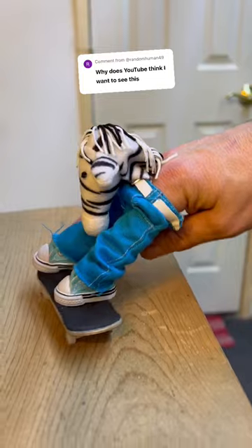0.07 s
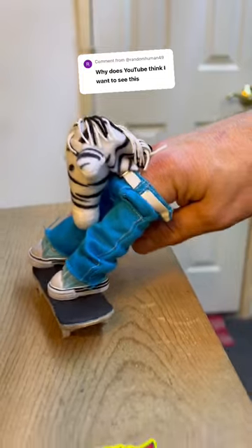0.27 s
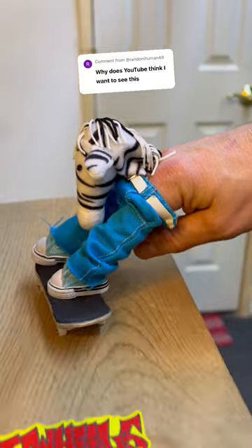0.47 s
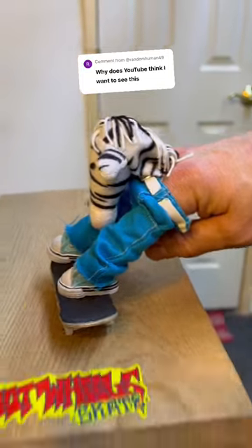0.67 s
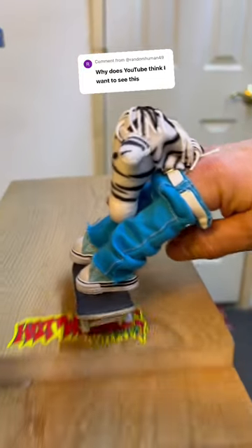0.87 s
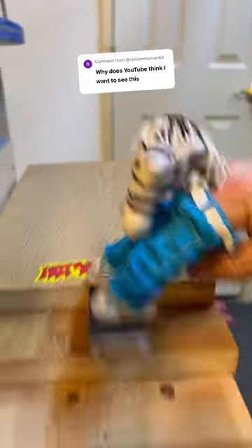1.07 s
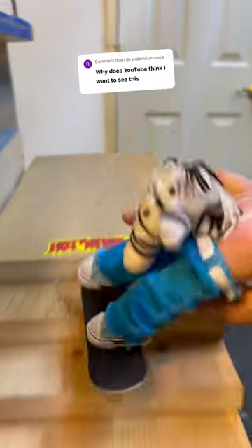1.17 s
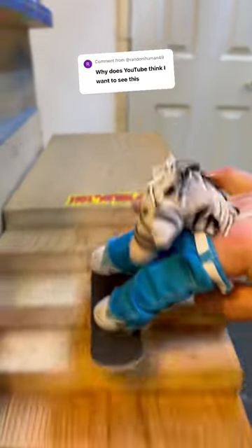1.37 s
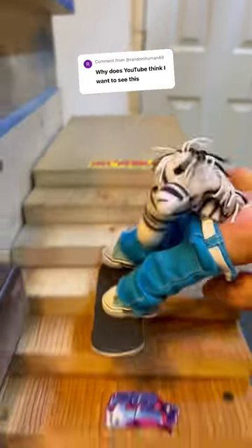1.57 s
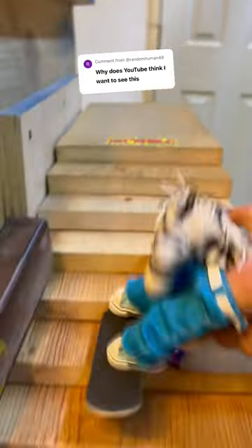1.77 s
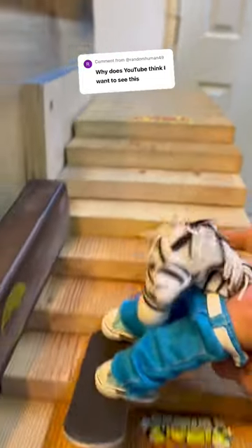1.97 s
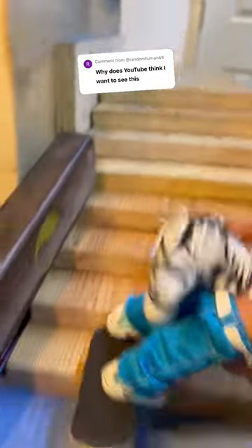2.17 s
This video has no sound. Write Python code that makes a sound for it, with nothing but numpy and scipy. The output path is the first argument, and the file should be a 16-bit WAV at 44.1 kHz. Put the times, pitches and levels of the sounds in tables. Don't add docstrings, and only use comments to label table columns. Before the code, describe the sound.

Toy skateboard rolls grittily over hollow wood, then clacks down small wooden steps in quick pairs

```python
import sys
import numpy as np
from scipy import signal
from scipy.fft import rfft, irfft, next_fast_len
from scipy.io import wavfile
from scipy.ndimage import uniform_filter1d

SR = 44100
rng = np.random.default_rng(int(sys.argv[2]) if len(sys.argv) > 2 else 0)


def gain_from_decibels(decibels):
    exponent = np.asarray(decibels, float) / 20
    return 10 ** exponent


def unload_wav(signal):
    wavfile.write(
        sys.argv[1],
        SR,
        np.round(np.clip(np.atleast_2d(signal).T, -1, 1) * 32767).astype(np.int16),
    )


N = 98298
t = np.arange(N) / SR
PORTS = np.array([[0], [-np.pi / 2]])


def read(table, hz):
    table = np.array(table, float)
    return np.interp(np.log(hz + 1), np.log(table[:, 0]), table[:, 1])


def unit(x):
    return x / np.sqrt(np.mean(x ** 2))


def band(x, hz, width):
    return signal.lfilter(*signal.iirpeak(hz, hz / width, SR), x)


def add(out, start_s, x):
    i = int(start_s * SR)
    out[..., i:i + x.shape[-1]] += x[..., :N - i]


def ring(hz, t60, rise, phase=0., size=8000):
    u = np.arange(size) / SR
    envelope = (1 - np.exp(-u / rise)) * np.exp(-np.log(1000) * u / t60)
    return envelope * np.sin(2 * np.pi * hz * u + phase)


def walk(rate):
    k = int(SR / rate)
    steps = np.repeat(rng.standard_normal(N // k + 1), k)
    return 1.65 * uniform_filter1d(uniform_filter1d(steps, k), k)[:N]


# pitch_hz, level_db (per Hz)
AIR_SPECTRUM = [(30, -7), (70, 1.5), (130, 9.5), (260, 6), (500, 10), (1000, -12.5), (2000, -24),
                (16000, -75)]
# pitch_hz, level_db (rms)
MAINS_HUM = [(120, -66.5), (241, -50)]


def air():
    rumble = 0
    for hz in 40 * 2 ** np.arange(0, 8.6, .5):
        noise = rng.standard_normal((2, N))
        noise = band(band(noise, hz, hz / 2), hz, hz / 2)
        rumble = rumble + gain_from_decibels(read(AIR_SPECTRUM, hz) + 0.97 * walk(5.71)) * noise
    hum = 0
    for hz, db in MAINS_HUM:
        level = gain_from_decibels(db + 3 + 2.5 * walk(18))
        hum = hum + level * np.sin(2 * np.pi * np.cumsum(hz + 5 * walk(14)) / SR)
    return unit(rumble) * gain_from_decibels(-41.5) + hum


ROOM_HZ, ROOM_T60_S, ROOM_DB = (350, 1500, 6000), (0.1, 0.43, 0.16), (-15.5, -24.5, -17)


def room(x):
    u, tail = np.arange(SR // 2) / SR, 0
    for hz, t60, db in zip(ROOM_HZ, ROOM_T60_S, ROOM_DB):
        fade = (1 - np.exp(-u / 0.0071)) * np.exp(-np.log(1000) * u / t60)
        part = band(rng.standard_normal((2, len(u))), hz, 1.276 * hz) * fade
        tail = tail + gain_from_decibels(db) * part / np.sqrt(np.sum(fade ** 2) * hz / SR * 4)
    return signal.fftconvolve(x, tail, axes=1)[:, :N]


# pitch_hz, width_hz, level_db
DECK_MODES = [(1350, 1010, -4), (2450, 535, 3.5), (2705, 880, 0), (3723, 736, 4), (4080, 960, 0.5),
              (5430, 1350, 5.5), (6760, 3150, 7), (7720, 2020, 8), (9580, 820, -3)]


def crack(treble_db, rise, buzz_db, size=2500):
    u = np.arange(size) / SR
    blow = (u / rise) ** 2 * np.exp(-u / rise) * 2
    buzz = gain_from_decibels(buzz_db) * (1 - np.exp(-u / rise)) * np.exp(-u / 0.009)
    burst = (blow + buzz) * rng.standard_normal((2, size))
    shake_db = 2.0 * rng.standard_normal(len(DECK_MODES))
    out = gain_from_decibels(-8 + treble_db) * signal.lfilter([1, -1], 1, burst)
    for k, (hz, width, db) in enumerate(DECK_MODES):
        level = gain_from_decibels(db + shake_db[k] + treble_db * (hz > 5000))
        out = out + (-1) ** k * level * band(burst, hz, width)
    return out / np.abs(out[0]).max()


# start_s, level_db, pitch_hz
AXLE_TICKS = [(0.209, -32.5, 6200), (0.2463, -34, 6270), (0.2618, -30, 5940), (0.2817, -35, 6100),
              (0.3197, -40.5, 5900), (0.3476, -43, 5870), (0.397, -35.5, 5760), (0.428, -41, 6220),
              (0.461, -39, 6030), (0.47, -38, 9140), (0.4795, -33.5, 5810), (0.5192, -45, 6200),
              (0.5462, -31, 6100), (0.5594, -43, 6760), (0.5836, -36, 5960), (0.601, -33, 6130),
              (0.6124, -29.5, 5950), (0.638, -36.5, 5800), (0.7024, -41, 5610), (0.7245, -32, 9300),
              (0.773, -35, 9700), (0.779, -33, 8800), (0.789, -32.5, 7430), (0.8053, -29, 8600),
              (0.815, -33, 8600), (0.88, -31, 8370), (0.9286, -27, 8550), (0.9421, -25, 9700),
              (0.9505, -21.5, 6800), (1.0006, -41, 6600), (1.0275, -29.5, 8650), (1.2154, -26, 5360),
              (1.22, -24, 5650), (1.2256, -17, 5410), (1.307, -27, 6100), (1.5344, -33, 8390),
              (2.2024, -37, 8400)]


def ticks():
    out = np.zeros((2, N))
    for start_s, db, hz in AXLE_TICKS:
        metal = ring(hz, 0.0073, 0.00091, PORTS, size=2500)
        add(out, start_s, gain_from_decibels(db - 2.0) * crack(2, 0.00024, -10.5) + gain_from_decibels(db - 1.0) * metal)
    return out


# pitch_hz, level_db, t60_s
PLATFORM_MODES = [(1055, -4.5, 0.09), (1112, 6.5, 0.058), (1173, 11, 0.045), (1194, -3, 0.047),
                  (1587, -12, 0.034)]
# start_s, level_db
FLAT_KNOCKS = [
    (.790, -36.5),
    (.892, -36),
    (.924, -30),
    (0.956, -25),
    (0.986, -32.5),
    (1.017, -28),
    (1.041, -30),
    (1.1178, -13),
    (1.1443, -22.5),
    (1.164, -33),
]


def knocks():
    out = np.zeros((2, N))
    for start_s, db in FLAT_KNOCKS:
        for hz, mode_db, t60 in PLATFORM_MODES:
            level_chance, phase_chance = rng.standard_normal(2)
            mode = ring(hz, .85 * t60, .005, .4 * phase_chance + PORTS)
            add(out, start_s, gain_from_decibels(db + mode_db + 2.0 * level_chance) * mode)
    return out


# pitch_hz, width_hz, level_db
GRIT_BANDS = [(2240, 240, 9.5), (3876, 350, 7.5), (5930, 2200, -0.5), (8340, 930, -1.5)]
# start_s, hiss_db, drone_db, scrape_db
ROLL_LEVELS = [(0.192, -98.5, -88, -57), (0.208, -55, -47, -56.5), (0.257, -78, -44.5, -46),
               (0.298, -69, -60, -58), (.52, -59.5, -76, -54.5), (.60, -59, -47, -56.5),
               (.68, -56, -54, -80), (.80, -57, -50, -102), (1.041, -55, -40, -40.5),
               (1.20, -58, -87, -44.5), (1.25, -67, -55.5, -50), (2.22, -57, -54, -48.5)]


def rolling():
    roll_s, *levels = np.array(ROLL_LEVELS).T
    hiss_db, drone_db, scrape_db = (np.interp(t, roll_s, level) for level in levels)
    grains = rng.random(N) < 700 / SR
    grit = grains * gain_from_decibels(3.0 * np.minimum(rng.exponential(size=N), 2.5))
    grit = signal.lfilter([1], [1, -.96], grit) + 0.58

    crushed = grit * rng.standard_normal((2, N))
    hiss = sum(gain_from_decibels(db) * band(crushed, hz, width) for hz, width, db in GRIT_BANDS)
    hiss = unit(hiss) * gain_from_decibels(hiss_db + 3.3 * walk(27.4) + 1.5)
    scrape = unit(band(grit * rng.standard_normal((2, N)), 1150, 1400)) * gain_from_decibels(scrape_db)

    grain = rng.standard_normal((2, N)) * gain_from_decibels(2.5 * walk(60))
    drone = sum(gain_from_decibels(db) * band(grain, hz, 3 / t60) for hz, db, t60 in PLATFORM_MODES)
    turn_db = 2.7 * np.cos(2 * np.pi * 32.6 * (t - .9600))
    drone = unit(drone) * gain_from_decibels(drone_db + turn_db + 1)
    return hiss + scrape + drone + ticks() + knocks()


# start_s, floor_db, table_db, box_db
LANDING_THUDS = [(0.101, -41.5, -56, -54), (0.168, -46, -44, -60), (1.105, -40, -37, -61),
                 (1.275, -38, -36, -35.5), (1.467, -44, -38.5, -43), (1.612, -34.5, -39, -49.5),
                 (1.781, -41, -39, -47.5), (1.741, -44, -44, -40.5), (1.903, -35.5, -47, -53),
                 (1.944, -45, -35.5, -41.5), (2.095, -39, -40, -54), (2.143, -40, -33, -32)]
THUD_HZ, THUD_T60_S, THUD_RISE_S = (55, 112, 285), (.10, .16, .09), (.02, .025, .01)


def thuds():
    out = np.zeros((2, N))
    for start_s, *levels_db in LANDING_THUDS:
        for db, hz, t60, rise in zip(levels_db, THUD_HZ, THUD_T60_S, THUD_RISE_S):
            add(out, start_s, gain_from_decibels(db + 16.5) * ring(hz, t60, rise, PORTS, size=14000))
    return out


# start_s, level_db, length_ms
EDGE_GRAZES = [(1.059, -21, 6.9), (1.261, -13.5, 2.8), (1.449, -27.5, 8.8), (1.595, -18.5, 8.2),
               (1.632, -22, 4.8), (1.727, -20.5, 11), (1.768, -20, 5.4), (1.791, -38, 1.6), (1.891, -22, 7),
               (1.932, -32, 2.5), (2.083, -21, 12), (2.129, -33, 3), (2.171, -31, 3), (2.221, -33, 3.3)]


def grazes():
    out = np.zeros((2, N))
    for start_s, db, ms in EDGE_GRAZES:
        add(out, start_s, gain_from_decibels(db) * crack(0.0, ms / 5000, -7))
    return out


# pitch_hz, level_db, t60_s
WOOD_MODES = [(439, -8.5, 0.027), (535, -11.5, 0.057), (702, -2.5, 0.023), (868, -4.5, 0.023),
              (1460, -7, 0.0067), (1940, 3.5, 0.0076)]


def tread(hz):
    wood = ring(hz, 30 / hz, .003, PORTS)
    for mode_hz, db, t60 in WOOD_MODES:
        level_chance, pitch_chance, phase_chance = rng.standard_normal(3)
        mode = ring(mode_hz * (1 + 0.063 * pitch_chance), t60, .001, 3 * phase_chance + PORTS)
        wood = wood + gain_from_decibels(db - 3.5 + 2.7 * level_chance) * mode
    return wood


# start_s, crack_db, treble_db, tread_db, tread_hz
LANDINGS = [(1.0690, 1.5, -18, -20.5, 1760), (1.101, 1, -11, -30.5, 438), (1.1032, -13, -28, 3, 1047),
            (1.2700, 0, -4.5, -16, 985), (1.2814, -18.5, -8, -5, 405), (1.2900, -10.5, -7.5, -7.5, 1120),
            (1.4620, -5, -4.5, -19.5, 1060), (1.465, -4, -6, -21.5, 421), (1.487, -3.5, -9.5, -14, 1470),
            (1.6063, -0.5, -6.5, -21.5, 860), (1.6389, -1, -5.5, -16.5, 545),
            (1.7364, -10.5, -13, -7.5, 580), (1.7400, -5, -5.5, -14.5, 568), (1.7437, -16.5, -17, -13, 546),
            (1.7775, 0, -12, -11, 985), (1.8974, -0.5, 1, -15.5, 823), (1.902, -0.5, -10, -17, 535),
            (1.9400, -2, -6, -15, 1237), (2.0899, -1.5, 2.5, -20, 621), (2.0943, 0.5, 0.5, -20.5, 868),
            (2.138, 2, -14.5, -28.5, 486)]
# deck_hz, deck_db, axle_hz, axle_db
LANDING_COLOURS = [(3505, -8.5, 6200, -4.5), (3740, -8, 5600, -9), (2300, -15, 5400, -20),
                   (1900, -15, 6520, -4.5), (1510, -17, 8500, -18), (1430, -8, 5250, 4),
                   (3460, -6.5, 28000, -6), (2980, -15, 9400, -2.5), (1670, -5, 9000, -6.5),
                   (3130, -13.5, 8180, -0.5), (2194, -7, 3200, -9.5), (3860, 0, 6500, -12),
                   (3650, -6, 8330, -8), (3680, -4, 11000, 3.5), (2534, -5.5, 5790, -7.5),
                   (3770, -9, 7840, -9), (2566, -7.5, 8180, -6), (3440, -9, 8420, -4.5),
                   (3780, -7, 6720, -4.5), (2740, -7, 5800, -9), (3610, -9, 7730, -10)]


def clacks():
    out = np.zeros((2, N))
    for landing, colour in zip(LANDINGS, LANDING_COLOURS):
        start_s, db, treble_db, tread_db, tread_hz = landing
        deck_hz, deck_db, axle_hz, axle_db = colour
        add(out, start_s, gain_from_decibels(db - 0.5) * crack(treble_db, .00045, -16))
        add(out, start_s, gain_from_decibels(db + deck_db + 1) * ring(deck_hz, 0.013, 0.00098, PORTS))
        add(out, start_s, gain_from_decibels(db + axle_db + 1) * ring(axle_hz, 0.0079, 0.00063, PORTS))
        add(out, start_s + 0.001126, gain_from_decibels(db + tread_db + 3.5) * tread(tread_hz))
    return out


def scene():
    toy = rolling() + thuds() + grazes() + clacks()
    return toy + room(toy) + air()


def low_pass(x):
    return signal.sosfilt(signal.butter(12, 16790, fs=SR, output="sos"), x)


# pitch_hz, level_db
MIC_RESPONSE = [(1500, -0.5), (5000, 0.5), (9600, 2), (10500, 2), (13000, -4), (15000, -9), (16000, -14),
                (16700, -76)]
# pitch_hz, level_db
PORT_TILT = [(450, 0), (800, 7), (1300, 3), (2600, 2), (3300, -2), (5500, 0)]
# pitch_hz, likeness (0-1)
PORT_LIKENESS = [(400, 0.96), (800, 0.76), (1200, 0.77), (2500, 0.18), (4500, 0.29), (5800, 1),
                 (10500, 0.61), (13000, 1)]
# pitch_hz, lead_rad
PORT_LEAD = [(60, 0), (300, .35), (500, .95), (750, 2.0), (1100, -.1), (1400, -.3), (2200, 0), (4000, .3),
             (4900, 3.1), (5600, 6.2), (7200, 6.5), (9500, 8.0), (12000, 9.42)]


def record(dry):
    size = next_fast_len(N + 4096)
    hz = np.arange(size // 2 + 1) * SR / size
    a, b = rfft(dry, size)
    alike = np.clip(read(PORT_LIKENESS, hz), 0, 1)
    turn = np.exp(.5j * read(PORT_LEAD, hz))
    tilt = gain_from_decibels(read(PORT_TILT, hz) / 2)
    left = a / turn / tilt
    right = (alike * a + np.sqrt(1 - alike ** 2) * b) * turn * tilt
    bass_cut = hz ** 2 / (hz ** 2 + 43 ** 2)
    pair = irfft(np.array([left, right]) * gain_from_decibels(read(MIC_RESPONSE, hz)) * bass_cut, size)[:, :N]
    limit = .95
    opening = np.clip((t - 0.0355) / 0.002, 0, 1)
    return low_pass(limit * np.tanh(pair / limit) * opening)


dry = scene()
out = record(dry)
unload_wav(out)
```